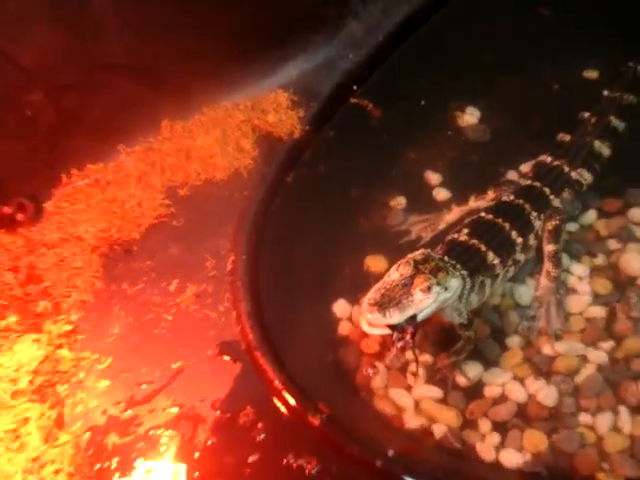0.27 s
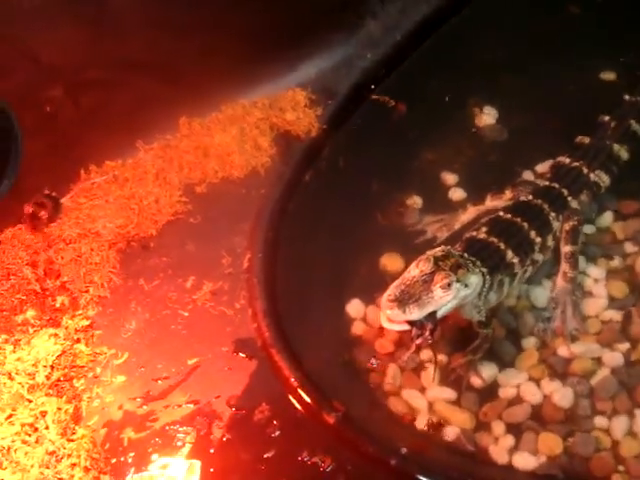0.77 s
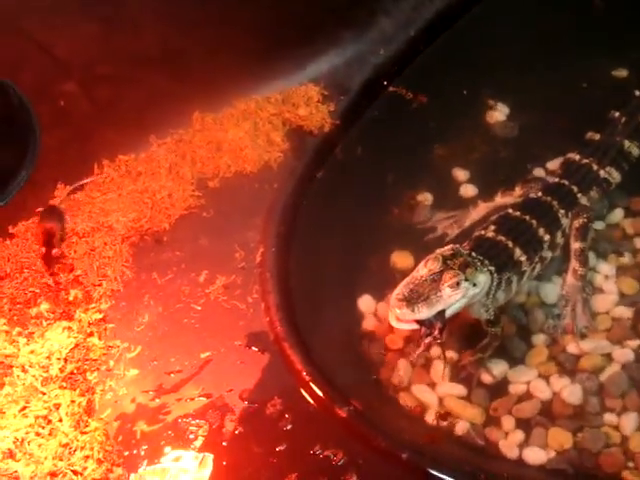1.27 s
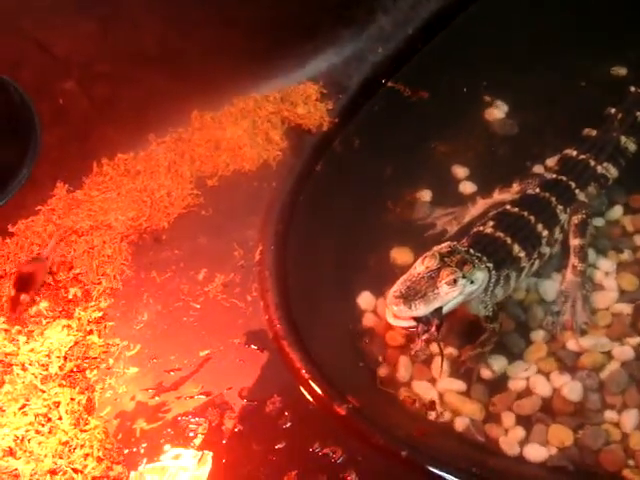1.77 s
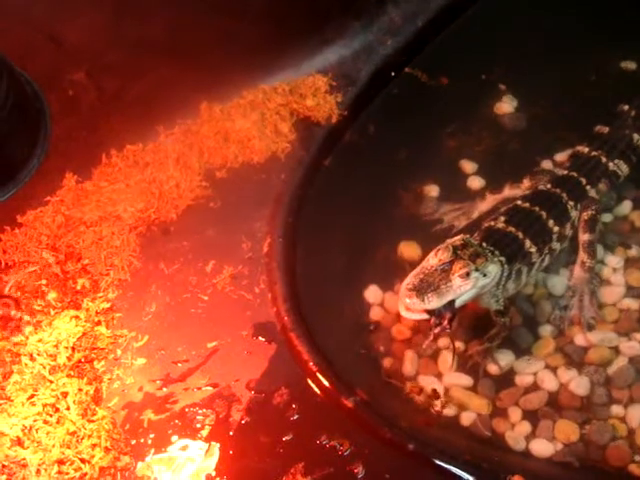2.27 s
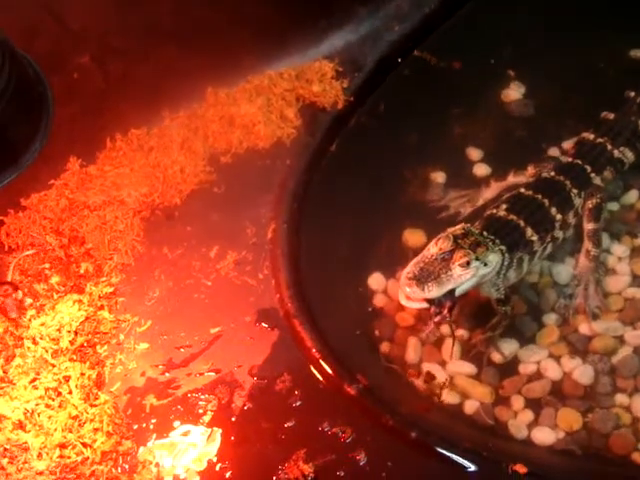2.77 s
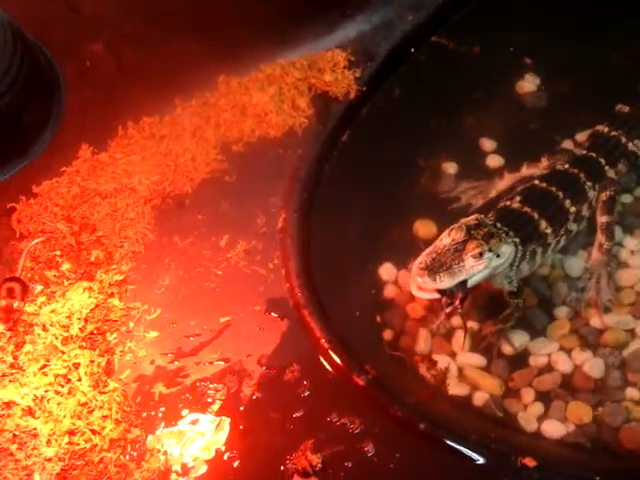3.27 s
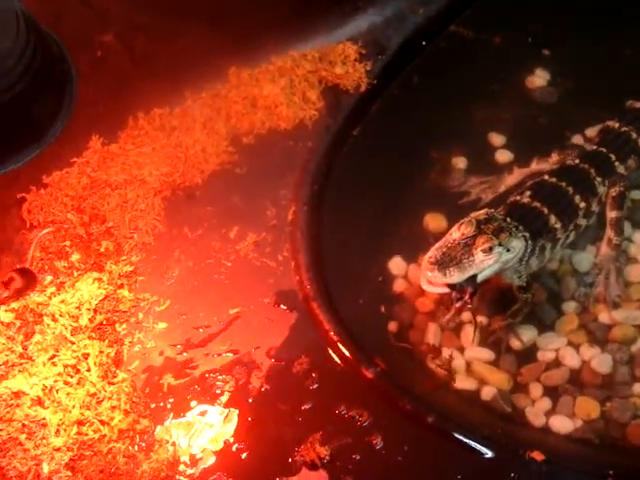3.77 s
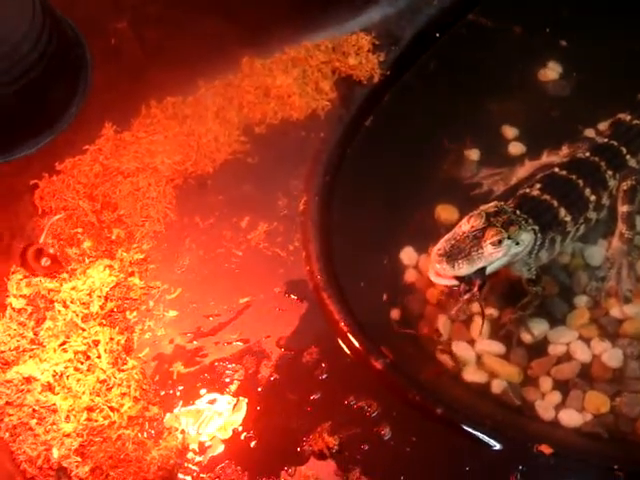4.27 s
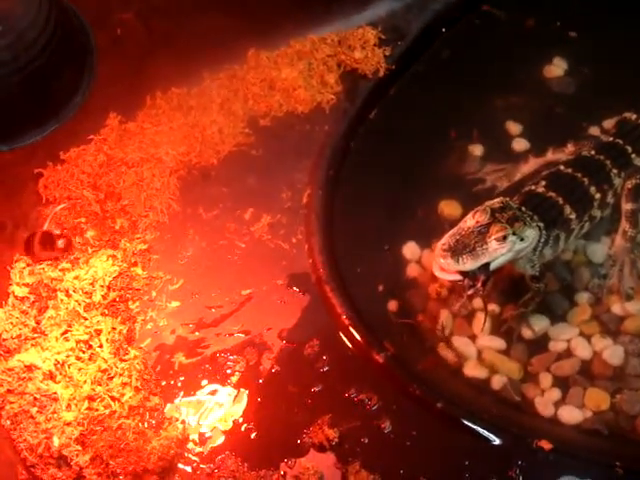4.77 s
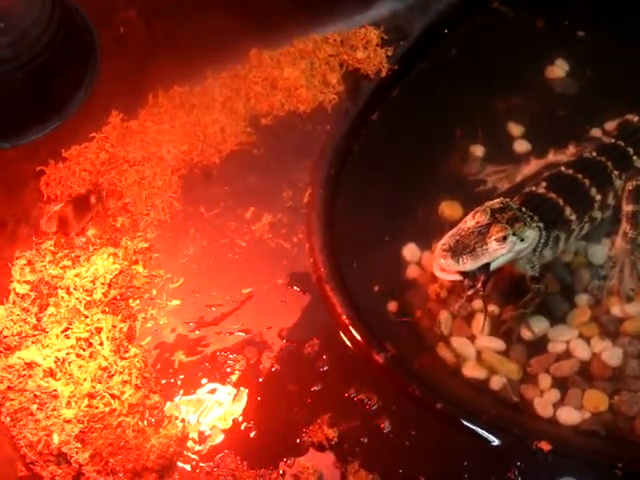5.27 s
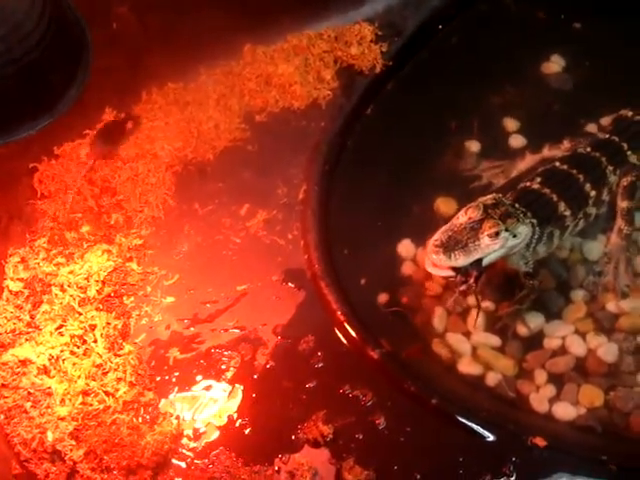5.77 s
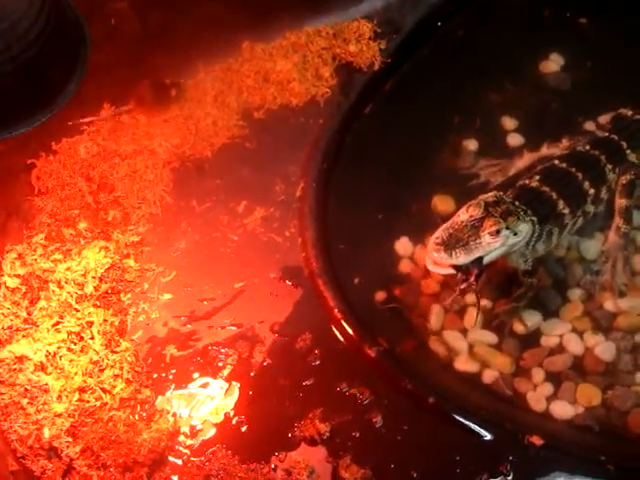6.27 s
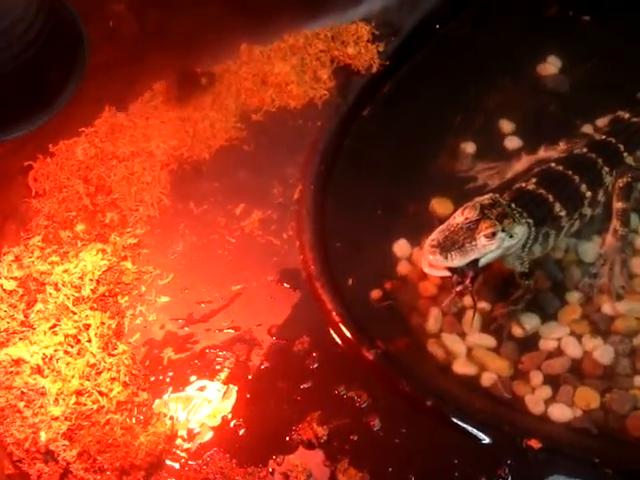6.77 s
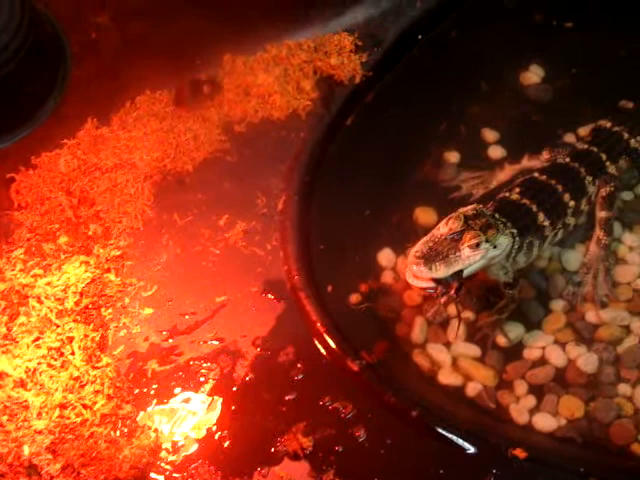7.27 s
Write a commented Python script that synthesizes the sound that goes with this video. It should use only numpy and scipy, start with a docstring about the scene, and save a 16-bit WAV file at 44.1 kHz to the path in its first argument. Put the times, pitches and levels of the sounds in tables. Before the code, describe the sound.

Steady buzzing mains hum and faint air hiss fill an indoor tub area. Handling clicks and a fluttering miniature motor crowd the first half second; afterwards dry snaps crack singly, with very short plastic ring and tight echoes. A faint mechanical purr and dull little knocks come and go. The animal makes no sound. Close microphone, identical in both ears.

```python
"""Clicks on a camera beside an indoor tub

A young alligator, itself silent here, holds its prey in the tub; a small hand-held camera listens close by.
Steady harmonics make the mains hum of the tank equipment, blurred tones a distant fan, coloured noise the hiss.
Sharp, dry clicks ring damped modes of the plastic case, with close echoes; fingers rub on it in tiny slips.
The zoom motor whirrs briefly as fluttering noise with rattling taps; the focus drive purrs as throbbing noise
and knocks in faint pulses. A few bright ticks are short noise edges with one narrow ring."""
import sys
import numpy as np
from scipy import signal
from scipy.fft import rfft, irfft
from scipy.io import wavfile

SR = 44100
rng = np.random.default_rng(int(sys.argv[2]) if len(sys.argv) > 2 else 0)


def to_wav(s):
    """Save 16-bit WAV."""
    ch = np.atleast_2d(s).T  # columns
    pcm = np.round(np.clip(ch, -1, 1) * 32767)  # PCM
    wavfile.write(sys.argv[1], SR, pcm.astype(np.int16))


N = 331632
# time kept free ahead of each contact, so that its treble can run ahead (s)
LEAD_S = 0.002


def amp(db):
    """Decibels to gain."""
    return 10 ** (np.asarray(db) / 20)


def unit(x):
    """Scales to rms 1."""
    return x / np.sqrt(np.mean(x ** 2) + 1e-20)


def read(points, hz):
    """Reads a spectrum on a log-frequency axis."""
    f, value = np.transpose(points)
    return np.interp(np.log(hz + 1), np.log(f + 1), value)


def noise(spectrum, size=N):
    """Noise of rms 1 with the given colour."""
    gain = amp(read(spectrum, np.fft.rfftfreq(size, 1 / SR)))
    return unit(irfft(rfft(rng.standard_normal(size)) * gain, size))


def colour(points, size=8192):
    """Causal (minimum-phase) response with the given (Hz, dB) shape."""
    log_gain = np.log(amp(read(points, abs(np.fft.fftfreq(size, 1 / SR)))))
    spectrum = np.exp(np.conj(signal.hilbert(log_gain)))
    return np.fft.ifft(spectrum).real[:size // 4]


def drift(rate_hz):
    """Slow random wander of rms 1, mostly below rate_hz."""
    lowpass = 1 / (1 + (np.fft.rfftfreq(N, 1 / SR) / rate_hz) ** 4)
    return unit(irfft(rfft(rng.standard_normal(N)) * lowpass, N))


def bump(at_s, width_s):
    """A smooth hump of height 1 in time."""
    return np.exp(-((np.arange(N) / SR - at_s) / width_s) ** 2)


def add(mix, s, sound):
    """Mixes a sound in at time s."""
    part = mix[max(round(s * SR), 0):][:len(sound)]
    part += sound[:len(part)]


def ping(t, hz, t60):
    """One dying mode: a sine that falls by 60 dB in t60 seconds."""
    return np.sin(2 * np.pi * hz * t) / 1000 ** (t / t60)


def running(start, stop, rise_s, coast_s):
    """Gain of a motor that spins up and, from its stop time, coasts to rest."""
    t = np.arange(N) / SR
    spin_up = np.clip((t - start) / rise_s, 0, 1)
    return spin_up * np.exp(-np.maximum(t - stop, 0) / coast_s)


def air():
    """A steady bed of room air and microphone hiss: coloured noise."""
    # colour of the hiss: pitch_hz, relative_db
    hiss_colour = [(20, -19.5), (60, -10), (100, -7.5), (150, -1.5), (230, 1), (420, 4.5), (600, 0),
                   (850, 1), (1050, -0.5), (1500, -3), (2100, -6), (3000, -6.5), (5500, -9), (8500, -10),
                   (10000, -13)]
    return amp(-55.5) * noise(hiss_colour)  # dB rms


def hum(waver_db=1.0):
    """Mains hum: harmonics of twice the mains frequency, each swaying slightly in level."""
    # harmonics of the hum: multiple of hum_hz, level_db (rms, before the sway)
    harmonics = [(1, -79.5), (2, -70.5), (3, -60.5), (4, -73.5), (5, -79), (6, -62), (7, -58), (8, -69),
                 (9, -59), (10, -78), (12, -77.5), (13, -82), (14, -69.5), (15, -70.5), (16, -70.5),
                 (17, -83.5), (18, -81.5), (20, -81), (21, -76.5), (22, -81.5)]
    hum_hz = 120.07
    t = np.arange(N) / SR
    out = np.zeros(N)
    for multiple, level_db in harmonics:
        tone = np.sin(2 * np.pi * (round(multiple) * hum_hz * t + rng.random()))
        out += np.sqrt(2) * amp(level_db + waver_db * drift(0.48)) * tone
    return out


def fan(width_hz=9):
    """A distant fan: tones blurred by random wavering, with one slow swell."""
    # blurred tones of the fan: pitch_hz, relative_db
    fan_tones = [(425, -2), (478, -2.5)]
    steady_db, swell_at_s, swell_s, swell_db = -70.5, 4.45, 0.4, 8
    turn = 2 * np.pi * np.arange(N) / SR
    tones = np.zeros(N)
    for hz, db in fan_tones:
        tones += amp(db) * (drift(width_hz) * np.cos(hz * turn) + drift(width_hz) * np.sin(hz * turn))
    return amp(steady_db + swell_db * bump(swell_at_s, swell_s)) * unit(tones)


def focus(step_db=4):
    """The focus drive nudges the lens thirty times a second: noise that throbs in level, never fully idle."""
    # runs of the focus drive: start_s, stop_s, level_db (rms at full drive), coast_s
    focus_runs = [(.3, 2.98, -56.5, 0.038), (4.66, 6.86, -57.5, 0.93)]
    # colour of the purr: pitch_hz, relative_db
    purr_colour = [(100, -23), (430, -17.5), (650, -3), (850, -19), (1000, 2.5), (1170, 2.5), (1350, -8.5),
                   (1700, -17), (2100, -4.5), (2400, -15.5), (2800, -11.5), (4500, -23), (10000, -21.5)]
    purr_hz, rise_s, idle_db = 29.97, 0.065, -66
    t = np.arange(N) / SR
    effort = amp(idle_db)
    for start, stop, db, coast_s in focus_runs:
        effort = np.maximum(effort, amp(db) * running(start, stop, rise_s, coast_s))
    nudges = amp(step_db * np.sin(2 * np.pi * purr_hz * t))
    return effort * unit(noise(purr_colour) * nudges)


def hunts(knock_db=-49.5, knock_width_s=0.00058, count=4):
    """The lens hunts for focus: dull knocks that grow firmer, each step a push and then an opposite brake."""
    # moments when the lens starts to hunt: start_s
    hunt_starts = [.356, 1.254, 1.957, 2.754, 3.754, 4.255, 5.153, 6.057, 6.668]
    step_s, brake_s, brake_share, growth_db = 0.04, 0.002, 0.47, 1.5
    length = count * step_s
    # one step out, four even steps back and one out again: delay in s, direction
    steps = [(0.0031, 1)]
    steps += [((k + 0.5) * step_s, -1) for k in range(count)]
    steps += [(length, 1)]
    pushes = np.zeros(N)
    for start in hunt_starts:
        for delay, direction in steps:
            force = direction * amp([growth_db * (delay / length) ** 2])
            add(pushes, start + delay, force)
            add(pushes, start + delay + brake_s, -brake_share * force)
    knock = signal.windows.gaussian(SR // 50, knock_width_s * SR)
    return amp(knock_db) * signal.fftconvolve(pushes, knock, "same")


def rattle():
    """Loose teeth in the zoom gears: uneven little taps, each ringing at its own pitch."""
    # kinds of tap: pitch_hz (middle), taps_per_s, level_db (strongest tap, relative), t60_s
    tap_kinds = [(570, 17, 0, 0.03), (1090, 26, 8, 0.026), (2000, 40, -2, 0.0073), (3480, 110, 0, 0.0068)]
    pitch_spread, range_db = 0.11, 23
    t = np.arange(SR // 40) / SR
    out = np.zeros(N)
    for hz, per_s, db, t60 in tap_kinds:
        # candidate taps, kept by chance to reach the rate
        for when, detune, weakness, chance in rng.random((N // 200, 4)):
            if chance < per_s * 200 / SR:
                tap_hz = hz * (1 + pitch_spread * (2 * detune - 1))
                add(out, when * N / SR, amp(db - range_db * weakness) * ping(t, tap_hz, t60))
    return out


def zoom(gear_hz=140, gear_db=3, flutter_db=1.5, whirr_db=-0.3):
    """A small geared motor: a whirr that flutters as the teeth mesh, while loose teeth tap the case."""
    # runs of the zoom motor: start_s, stop_s, level_db (drive gain), coast_s
    zoom_runs = [(0.08, 0.376, -47, 0.015), (0.468, 0.47, -44, 0.075)]
    # colour of the whirr: pitch_hz, relative_db
    whirr_colour = [(150, -19), (430, -12), (560, 4), (680, -5.5), (950, 1.5), (1140, 10.5), (1400, -11),
                    (2200, -12), (2750, -4), (3700, -5.5), (4700, -14.5), (7400, -12), (8700, -6),
                    (10000, -9)]
    spin_up_s = 0.027
    mesh_hz = gear_hz * (1 + 0.119 * drift(11.1))
    mesh = np.sin(2 * np.pi * np.cumsum(mesh_hz) / SR)
    flutter = amp(gear_db * mesh + flutter_db * drift(60))
    whirr = amp(whirr_db) * unit(noise(whirr_colour) * flutter)
    effort = sum(amp(db) * running(start, stop, spin_up_s, coast_s) for start, stop, db, coast_s in zoom_runs)
    return effort * (whirr + rattle())


def rubs(grains_per_s=2600, spread_db=5.0, scrape_db=2):
    """Fingers shift on the case: a swell of tiny uneven slips, each a short coloured grain."""
    # rubs: middle_s, half_length_s, level_db (rms at the middle),
    # clatter_db (near 2 kHz, relative), hiss_db (near 8 kHz, relative)
    finger_rubs = [(0.092, 0.015, -48.5, -3, -10), (0.25, 0.014, -57, -8, -7),
                   (0.307, 0.019, -55.5, -6, -5), (0.364, 0.012, -61, 0, 2), (0.497, 0.01, -45.5, -6, -8),
                   (0.516, 0.0071, -52, -3, 4), (0.613, 0.034, -58, 2, -17), (6.72, 0.094, -62.5, -10, 3),
                   (6.898, 0.04, -61, -6, -12), (7.093, 0.012, -59, -10, -2), (7.252, 0.021, -51.5, -2, -2),
                   (7.28, 0.023, -53, -2, -5)]
    out = np.zeros(N)
    for s, width_s, db, clatter_db, hiss_db in finger_rubs:
        size = amp(spread_db * np.minimum(rng.exponential(1, N), 3)) * rng.choice([-1, 1], N)
        slips = size * (rng.random(N) < grains_per_s / SR)
        grain = colour([(100, -27), (450, -4), (750, -1), (1200, 4), (1600, clatter_db + 1),
                        (2600, clatter_db), (3700, scrape_db), (4700, -8), (6500, hiss_db - 6.5),
                        (9000, hiss_db), (12000, -32)], size=2048)
        out += amp(db) * bump(s, width_s) * unit(signal.oaconvolve(slips, grain)[:N])
    return out


def ticks(edge_db=2, edge_s=0.00054):
    """Tiny crisp ticks: a wide bright edge, then a few milliseconds of one narrow ring."""
    # faint bright ticks: start_s, pitch_hz, level_db (of the ring), t60_s
    bright_ticks = [(2.9745, 7940, -50, 0.012), (4.4505, 5750, -45, 0.0076), (4.4605, 5750, -52, 0.016),
                    (4.9627, 3400, -48, 0.0091), (4.9636, 4730, -50, 0.028), (6.883, 3760, -56, 0.02)]
    t = np.arange(SR // 25) / SR
    swell = t / edge_s * np.exp(1 - t / edge_s)
    out = np.zeros(N)
    for s, hz, db, ring_t60 in bright_ticks:
        edge = noise([(1500, -25), (3200, 3), (10000, -2)], size=len(t)) * swell
        add(out, s, amp(db) * (amp(edge_db) * edge + ping(t, hz, ring_t60)))
    return out


def burst(t, length_s):
    """A brief swell of rubbing noise, of energy 1, from the moment of contact."""
    age = np.maximum(t - LEAD_S, 0)
    rub = rng.standard_normal(len(t)) * age * np.exp(-2 * age / length_s)
    return rub / np.linalg.norm(rub)


def blow(t):
    """The force of one contact: a push whose treble arrives first, and a short bright crunch as surfaces meet."""
    ahead_s_per_octave, crunch_hz, crunch_s, crunch_db = 0.000229, 2400, 0.0017, -10.5
    hz = np.fft.rfftfreq(len(t), 1 / SR)
    delay = LEAD_S - ahead_s_per_octave * np.log2(np.maximum(hz / 1500, 1))
    # summing the delay over frequency gives the phase
    push = irfft(np.exp(-2j * np.pi * np.cumsum(delay) * hz[1]), len(t))
    highpass = signal.butter(2, crunch_hz, "high", fs=SR, output="sos")
    crunch = signal.sosfilt(highpass, burst(t, crunch_s))
    return push + amp(crunch_db) * crunch


def disperse(x, lag_s):
    """Bending waves: the treble arrives first; 1 kHz lags by lag_s."""
    hz = np.fft.rfftfreq(2 * len(x), 1 / SR)
    phase = np.exp(-4j * np.pi * lag_s * np.sqrt(1000 * hz))
    return irfft(rfft(x, 2 * len(x)) * phase)[:len(x)]


def case_ring(t, pitch, length, lag_s=0.00023, grit_db=-30, grit_t60=0.016):
    """The plastic case after one blow: damped modes, dispersed, over a little grit."""
    # modes of the case: pitch_hz and t60_s (each before the click's own factor), relative level_db between them
    case_modes = [(366, -32, 0.11), (397, -18.5, 0.03), (477, -17, 0.046), (701, -25.5, 0.14),
                  (863, -16.5, 0.027), (1020, -16, 0.017), (1094, 0.8, 0.025), (1323, -21, 0.031),
                  (1392, -18.5, 0.052), (1734, -18, 0.027), (2220, -20.5, 0.016), (2617, -16, 0.019),
                  (2960, -10.5, 0.0083), (3920, -15, 0.0022), (4820, -24.5, 0.013), (6050, -21.5, 0.0024),
                  (8950, -7, 0.0031)]
    rings = sum(amp(db) * ping(t, hz * pitch, t60 * length) for hz, db, t60 in case_modes)
    # the crowded upper modes blur into a few milliseconds of grit
    grit = noise([(900, -18), (2200, 0), (3800, 7), (4600, 1), (9500, -12)], size=len(t))
    return disperse(rings, lag_s) + grit * amp(grit_db) / 1000 ** (t / grit_t60)


def clicks(tail_db=-34, tail_t60=0.22):
    """A blow and a brief scrape ring the case, leaving close echoes and a faint scattered tail."""
    # clicks; the spot that is struck sets the colour, tunes and damps the case, pings by itself and mutes a mode:
    # start_s, level_db (gain), thud_db (near 400 Hz), body_db (near 650 Hz), clatter_db (near 2 kHz),
    # snap_db (near 3.5 kHz), tick_db (near 7 kHz), scrape_db (against the blow), pitch (factor),
    # length (ring factor), ping_hz, ping_db (gain), muted_hz
    struck_spots = [(0.1025, -41, -2, 0, 11, 9, -6, 4, 0.92, 0.72, 3950, -40, 750),
                    (0.1115, -34, 10, 7.5, 16, 1, 11, 2.5, 1.04, 0.79, 2510, -33, 1030),
                    (0.1149, -25.5, 10.5, -3, -8, -9, 13, -7, 0.98, 0.49, 1480, -27, 696),
                    (0.162, -49, 2, 0, 11, 5, 0, 2, 1, 0.8, 2650, -48, 1100),
                    (0.2, -43, -4, -8, -6, -6, -8, -3, 1.1, 1.5, 3320, -57, 750),
                    (0.234, -47, -8, -6, -6, -1, -6, -6, 0.93, 1.3, 3700, -52, 1500),
                    (0.278, -49, -2, -9, -5, 3, -6, -2, 1, 1.3, 560, -45, 1490),
                    (0.348, -41, -2, -3, -4, 1, -2, -1, 0.98, 1.4, 3100, -54, 1500),
                    (0.41, -42.5, -5, -3, -1, 1, -2, 1, 1.12, 1.1, 2900, -50, 1700),
                    (0.508, -36.5, 4, 9, 6, 1, -2, -1, 0.85, 0.67, 1830, -36, 2620),
                    (0.5111, -34.5, -7, 13, -6, 11, 2, -14, 0.94, 0.61, 5250, -33, 2600),
                    (0.5169, -30, -7, -3, -16, -13, -18, -6, 0.99, 1.7, 1140, -33, 1380),
                    (0.559, -45, -6, -4, -6, 0, -8, 4, 1, 2, 2700, -52, 1600),
                    (0.578, -40, -6, -7, -2, -1, -8, -2, 1.02, 1.4, 2700, -52, 1400),
                    (1.4816, -14, -3.5, -9, -6, 0, 4.5, -16, 1.02, 0.95, 3860, -26.5, 1660),
                    (1.629, -26.5, 2, -1.5, 0.5, 18, 6, -3.5, 0.86, 0.49, 2770, -26.5, 5000),
                    (1.6349, -44, 12, -5, -4, 9, -2, -5, 0.9, 1.4, 2770, -45, 1400),
                    (2.976, -52.5, -5, 1, 25, 7, 8, 3, 1.04, 0.8, 3130, -50, 2200),
                    (3.311, -37, -15, -5, -3, 5, 1, -5, 0.99, 1.04, 2750, -42, 1800),
                    (4.002, -37, -7, -26, -2, -4, -13, -3.5, 0.91, 1.3, 2800, -56, 1600),
                    (4.778, -54, -5, 0, 18, 8, -4, 2, 1.05, 1, 2300, -55, 1100),
                    (5.8198, -18, -8, 1, 11, 8, 12, -12, 0.992, 0.9, 2275, -20, 2680),
                    (5.8298, -40, 6, 9, 0, -4, -14, -3, 1, 1.1, 2860, -53, 1500)]
    # early echoes from the tub: delay_s, level_db (below the click)
    tub_echoes = [(0.0061, -27.5), (0.0092, -42)]
    scrape_s, ping_t60_s, muted_q, echo_dull_hz = 0.0033, 0.0089, 6.9, 2200  # ping_t60_s before the length factor
    t = np.arange(SR // 8) / SR
    out = np.zeros(N)
    for (s, db, thud_db, body_db, clatter_db, snap_db, tick_db, scrape_db,
         pitch, length, ping_hz, ping_db, muted_hz) in struck_spots:
        force = blow(t) + amp(scrape_db) * burst(t, scrape_s)
        scatter = noise([(150, -9), (400, 11), (1100, 30), (1600, 0), (2800, -6), (6000, -9)], size=len(t))
        response = case_ring(t, pitch, length) + scatter * amp(tail_db - 60 * t / tail_t60)
        # taking away a narrow band mutes the mode
        response = response - signal.lfilter(*signal.iirpeak(muted_hz, muted_q, fs=SR), response)
        # the hardness of the contact colours the blow; so small a body gives off no bass
        contact = colour([(30, -54), (120, -20.5), (240, thud_db - 23.0), (380, thud_db), (640, body_db),
                          (900, 2.0), (1420, 0.5), (2000, clatter_db), (3500, snap_db),
                          (7000, tick_db), (10000, tick_db - 12.0)])
        response = amp(db) * signal.fftconvolve(response, contact)[:len(t)]
        response += amp(ping_db) * ping(t, ping_hz, ping_t60_s * length)
        click = signal.fftconvolve(force, response)
        add(out, s - LEAD_S, click)
        echo = signal.lfilter(*signal.butter(2, echo_dull_hz, fs=SR), click)
        for delay, echo_db in tub_echoes:
            add(out, s - LEAD_S + delay, amp(echo_db) * echo)
    return out


def scene():
    """Everything reaches one microphone, the same in both ears."""
    background = hum() + air() + fan()
    motors = focus() + hunts() + zoom()
    contacts = rubs() + ticks() + clicks()
    mono = background + motors + contacts
    return np.array([mono, mono])


def record(dry):
    """The recorder's band limit: a steep lowpass."""
    edge_hz = 10080
    lowpass = signal.firwin(601, edge_hz, window=("kaiser", 8), fs=SR)
    return signal.oaconvolve(dry, lowpass[None], "same", axes=1)


dry = scene()
out = record(dry)
to_wav(out)
```